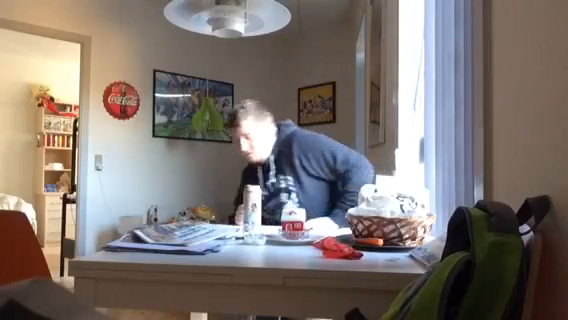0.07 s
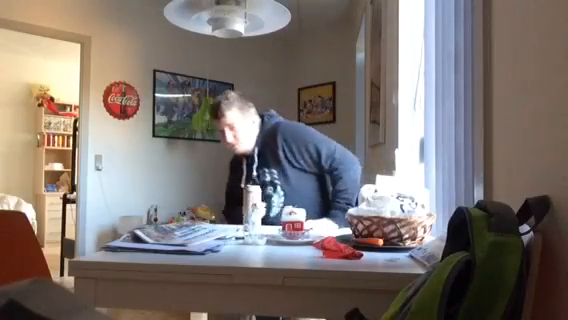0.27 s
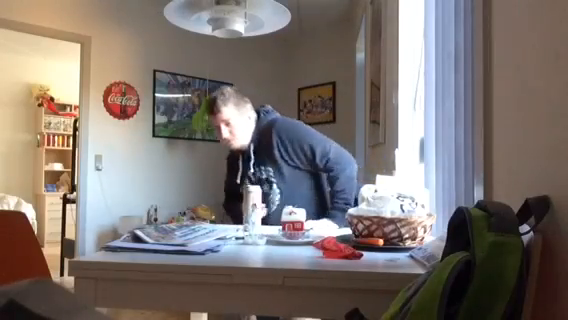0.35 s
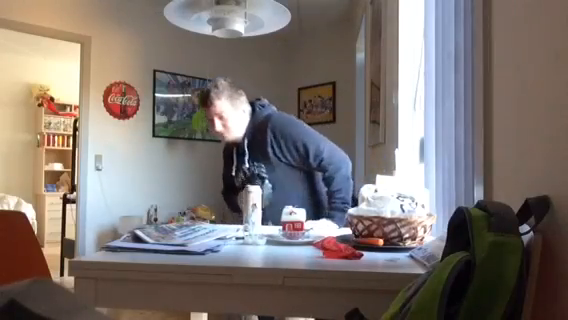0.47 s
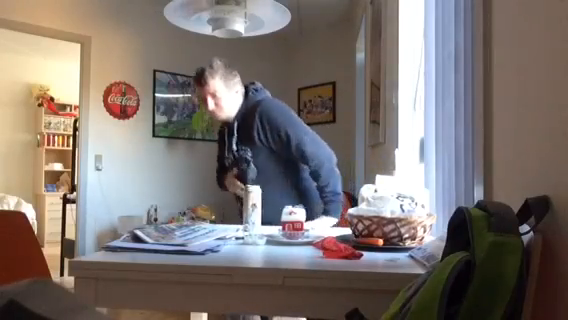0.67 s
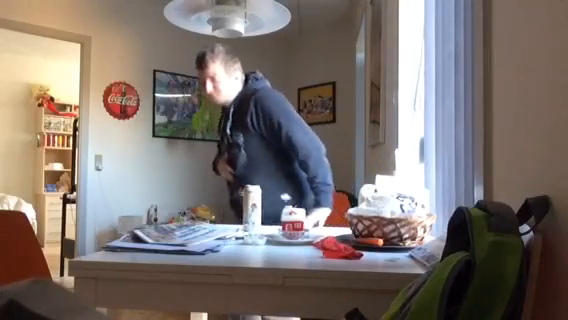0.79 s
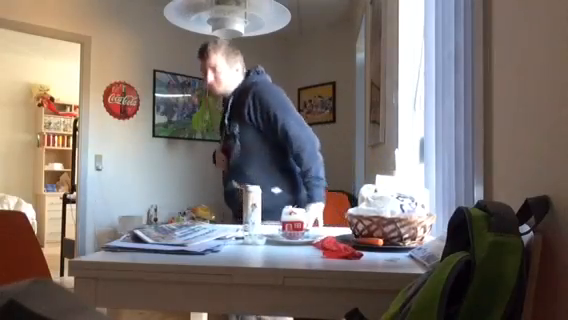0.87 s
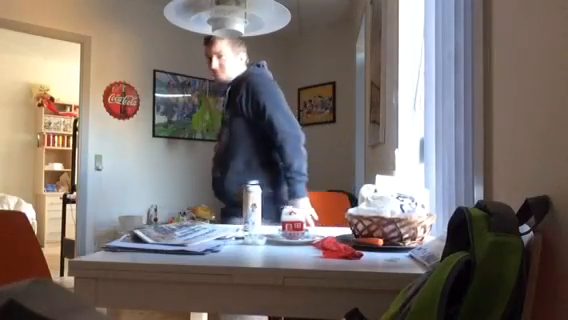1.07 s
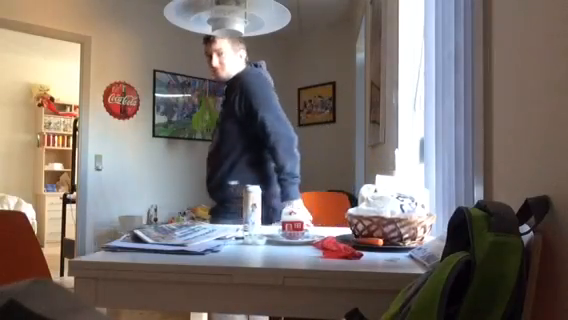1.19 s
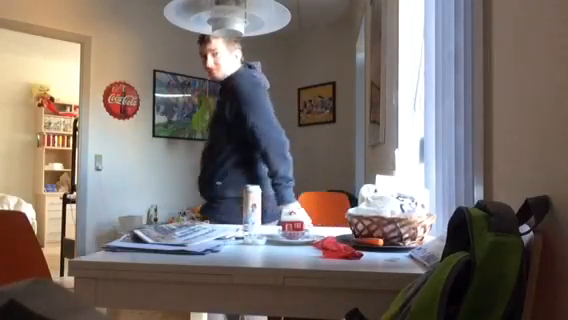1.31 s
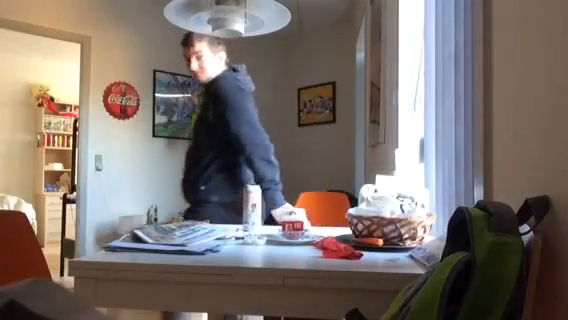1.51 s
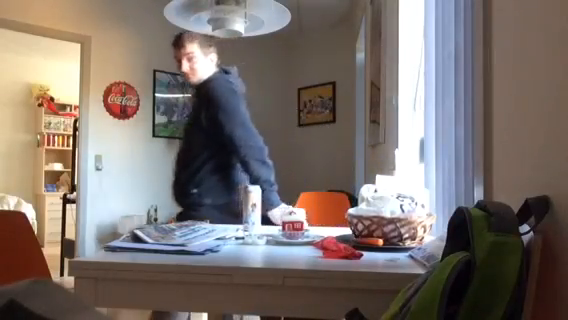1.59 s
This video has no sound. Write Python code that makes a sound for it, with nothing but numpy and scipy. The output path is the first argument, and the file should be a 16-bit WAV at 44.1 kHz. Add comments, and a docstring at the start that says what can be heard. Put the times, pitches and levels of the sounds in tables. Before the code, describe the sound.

In a small, slightly echoing room, a chair is pushed back from a table, its legs rasping and squeaking until a wooden tick ends the slide. Then clothes rustle lightly and dull footsteps thud as someone stands.

```python
"""A chair pushed back from a table

Someone stands up in a small, live room with a hard floor. Stick-slip friction of the chair's legs
drives the resonances of its frame: it judders, squeaks, rasps and groans, then stops with a sharp tick.
Soft, heavy steps set the floorboards ringing, and clothes rustle over quiet room noise."""
import sys
import numpy as np
from scipy import signal
from scipy.fft import rfft, irfft, next_fast_len
from scipy.io import wavfile
from scipy.ndimage import map_coordinates

SR = 44100
rng = np.random.default_rng(int(sys.argv[2]) if len(sys.argv) > 2 else 0)


def bounce(signal):
    """Save signal as a 16-bit WAV file at the path given by the first command-line argument."""
    frames = np.transpose(np.atleast_2d(signal))
    limited = np.clip(frames, -1, 1)
    pcm = np.round(limited * 32767).astype(np.int16)
    wavfile.write(sys.argv[1], SR, pcm)


N = 72765
RASP_SLIP_HZ, GROAN_SLIP_HZ, GRAIN_HZ = 400, 260, 3000  # median impulse rates


def amp(db):
    """Amplitude ratio of a level in decibels."""
    return 10 ** (np.asarray(db) / 20)


def unit(x):
    """Normalisation to an rms of 1."""
    return x / np.sqrt(np.mean(x ** 2) + 1e-20)


def along(points, hz):
    """Interpolation of (frequency_hz, value) points on a logarithmic frequency axis."""
    frequencies, values = np.transpose(points)
    return np.interp(np.log(hz + 1), np.log(frequencies + 1), values)


def envelope(points):
    """Amplitude envelope through (time_s, level_db) points, silent outside them."""
    time_s, level_db = np.transpose(points)
    t = np.arange(N) / SR
    return amp(np.interp(t, time_s, level_db)) * ((t >= time_s[0]) & (t <= time_s[-1]))


def filtered(x, response):
    """Linear filtering: the spectrum is multiplied by a complex frequency response."""
    size = 2 * next_fast_len(N)
    return irfft(rfft(x, size) * response(np.fft.rfftfreq(size, 1 / SR)), size)[:N]


def coloured(x, spectrum):
    """Minimum-phase filtering to a (frequency_hz, gain_db) shape, made causal by folding the cepstrum."""
    def response(hz):
        cepstrum = irfft(np.log(amp(along(spectrum, hz))))
        half = len(cepstrum) // 2
        return np.exp(rfft(np.r_[cepstrum[0], 2 * cepstrum[1:half], np.zeros(half)]))
    return filtered(x, response)


def resonate(x, modes):
    """Modal superposition: x drives parallel damped resonators (pitch_hz, width_hz, gain_db)."""
    def response(hz):
        return sum(amp(gain_db) * 1j * hz * width / (pitch ** 2 - hz ** 2 + 1j * hz * width)
                   for pitch, width, gain_db in modes)
    return filtered(x, response)


def slips(median_hz, jitter, scatter_db):
    """Stick-slip friction as an impulse train with log-normal spacings and sizes."""
    spacing, size = rng.standard_normal((8192, 2)).T
    at = (np.cumsum(np.exp(jitter * spacing)) * SR / median_hz).astype(int)
    return np.bincount(at[at < N], amp(scatter_db * size[at < N]), N)


def add(track, start_s, sound):
    """Superposition of a sound on the track from start_s onward."""
    start = round(start_s * SR)
    track[start:start + len(sound)] += sound[:N - start]


def in_room(x, tail_db):
    """Reverberation: a diffuse, exponentially decaying tail follows the sound, longest in the bass."""
    # reverberation time: frequency_hz, t60_s
    decay = [(80, 0.61), (300, 0.39), (2000, 0.32), (6000, 0.37), (15000, 0.36)]
    delay_s = .004
    hz, t, noise = signal.stft(rng.standard_normal(SR // 2), SR, nperseg=256)
    tail = signal.istft(noise * amp(-60 * t / along(decay, hz)[:, None]), SR)[1]
    tail = np.pad(tail / np.linalg.norm(tail), (round(delay_s * SR), 0))
    return (x + amp(tail_db) * signal.fftconvolve(x, tail)[:N]) / np.hypot(1, amp(tail_db))


def room_noise():
    """Stationary Gaussian noise, strongest in the bass, forms the background."""
    # noise spectrum: frequency_hz, gain_db
    spectrum = [(20, -3), (45, -1), (90, 6.5), (150, -2.5), (300, -2), (650, -6), (1200, -14.5),
                (4000, -29.5), (9000, -42), (16000, -36)]
    return amp(-63.5) * unit(coloured(rng.standard_normal(N), spectrum))


def grains(levels, spectrum, scatter_db, jitter=.8):
    """Granular friction: tiny impulses, too dense to hear singly, merge into coloured noise."""
    return unit(coloured(slips(GRAIN_HZ, jitter, scatter_db), spectrum)) * envelope(levels)


def clothes():
    """Cloth friction: a sleeve slides on the table, clothes and soles rub, the turning body swishes."""
    # envelope of each rub: time_s, level_db
    sleeve_levels = [(0, -66), (.045, -64.5), (.11, -70.5), (.17, -74), (.22, -88)]
    rustle_levels = [(0, -66), (.1, -70.5), (.2, -62.5), (.85, -63.5), (.91, -62), (.96, -63), (1.04, -63),
                     (1.11, -58), (1.18, -58), (1.26, -63), (1.34, -67.5), (1.42, -74), (1.48, -65),
                     (1.58, -85), (1.7, -69)]
    swish_levels = [(0, -69), (.05, -72.5), (.12, -84), (.3, -68.5), (.7, -64), (.85, -63.5), (1.05, -64),
                    (1.11, -62), (1.26, -64.5), (1.34, -67.5), (1.4, -72), (1.48, -69), (1.58, -72.5),
                    (1.7, -79)]
    # spectrum of each rub: frequency_hz, gain_db
    sleeve_spectrum = [(400, -30), (1900, 7.5), (2700, 0.5), (4000, 5.5), (5000, -10), (10000, -12),
                       (16000, -16)]
    rustle_spectrum = [(150, -6.5), (500, -0.5), (750, -3.5), (950, -2), (1400, 0.5), (2500, -7),
                       (3800, -15), (6000, -20.5), (16000, -41)]
    swish_spectrum = [(500, -3), (2500, -4.5), (4000, -8.5), (5500, -0.5), (8000, -1.5), (9800, -12.5),
                      (13000, -14), (16000, -15.5)]
    sleeve = grains(sleeve_levels, sleeve_spectrum, scatter_db=.5)
    rustle = grains(rustle_levels, rustle_spectrum, scatter_db=.5)
    swish = grains(swish_levels, swish_spectrum, scatter_db=.5)
    return in_room(sleeve + rustle + swish, tail_db=-6.5)


def judder():
    """Forced resonance: nearly periodic slips sustain the lowest mode of the chair's frame."""
    # envelope of the shaking: time_s, level_db
    levels = [(.185, -77), (.198, -48), (.215, -44), (.24, -31.5), (.268, -47.5), (.315, -42.5),
              (.345, -51), (.42, -44), (.53, -46), (.572, -46), (.615, -50.5), (.735, -48), (.77, -58),
              (1.04, -60.5), (1.1, -75)]
    pitch_hz, width_hz = 102.4, 38
    mode = [(pitch_hz, width_hz, 0)]
    pulses = slips(pitch_hz, jitter=.051, scatter_db=5.5)
    return unit(resonate(resonate(pulses, mode), mode)) * envelope(levels)


def legs(levels, median_hz, modes, scatter_db, shell_db):
    """Impulse excitation: irregular slips of the legs drive the chair's modes and its broadband shell."""
    # response of the shell: frequency_hz, gain_db
    shell_spectrum = [(25, -20), (50, -5), (90, 9), (170, 1), (300, -0.5), (700, -4.5), (900, -7.5),
                      (1300, -13.5), (2000, -7.5), (3000, -16.5), (6000, -21.5), (9000, -40), (16000, -49)]
    corner_hz = 2830  # of three low-pass poles that dull the ringing
    pulses = slips(median_hz, jitter=.8, scatter_db=scatter_db)
    ring = filtered(resonate(pulses, modes), lambda hz: 1 / (1 + 1j * hz / corner_hz) ** 3)
    shell = amp(shell_db) * unit(coloured(pulses, shell_spectrum))
    return unit(unit(ring) + shell) * envelope(levels)


def rasp():
    """Fast stick-slip motion rasps under the sitter's weight and returns as a light last rub."""
    # envelope of the rasp: time_s, level_db
    levels = [(.185, -70), (.205, -60.5), (.225, -47.5), (.29, -40.5), (.352, -40.5), (.366, -33.5),
              (.46, -33), (.52, -38), (.62, -44.5), (.66, -51), (.72, -57), (.86, -68.5), (.92, -55),
              (.96, -52.5), (1.05, -71)]
    # modes of the loaded chair: pitch_hz, width_hz, gain_db
    modes = [(230, 12, -9), (298, 28, 7.5), (338, 55, 3), (510, 250, 4), (668, 82, 3), (760, 70, -15),
             (974, 150, 2), (1157, 59, 3), (1414, 72, 3), (1844, 59, -1.5)]
    return legs(levels, RASP_SLIP_HZ, modes, scatter_db=2, shell_db=-8.5)


def grit():
    """Granular friction under the chair's feet gives the scrape its gritty treble."""
    # envelope of the grit: time_s, level_db
    levels = [(.2, -89), (.26, -70), (.35, -61), (.364, -40.5), (.445, -43), (.5, -49.5), (.6, -57.5),
              (.66, -66), (.73, -59.5)]
    # grain spectrum: frequency_hz, gain_db
    spectrum = [(500, -47), (1600, 10), (2700, -5), (3600, 2), (4800, -3.5), (6000, -6), (7800, -8),
                (9500, -19.5), (12000, -22.5), (16000, -35)]
    return grains(levels, spectrum, scatter_db=3.5)


def squeak():
    """As static friction gives way, slips of the chair's feet excite two high, narrow resonances."""
    # envelope of the squeak: time_s, level_db
    levels = [(.213, -91), (.219, -48), (.265, -59), (.29, -65), (.325, -82), (.36, -27)]
    # resonances, applied twice: pitch_hz, width_hz, gain_db
    modes = [(1185, 56, -2), (2480, 81, -14.5)]
    pulses = slips(RASP_SLIP_HZ, jitter=.46, scatter_db=6)
    return unit(resonate(resonate(pulses, modes), modes)) * envelope(levels)


def thumps():
    """Impacts of chair feet, heels and soles push the floor and excite modes near each contact's pitch."""
    # impacts, lower in pitch for softer contacts: start_s, level_db, pitch_hz
    impacts = [(0.192, -48.5, 252), (0.224, -48, 196), (0.472, -41.5, 81.6), (0.724, -48, 320),
               (0.813, -46, 77.5), (0.892, -54, 74.4), (1.077, -40, 285), (1.0864, -46.5, 111),
               (1.099, -39.5, 192), (1.13, -43.5, 101), (1.135, -49, 338), (1.198, -54, 105),
               (1.361, -40.5, 137), (1.367, -47.5, 556), (1.384, -43, 120), (1.449, -45.5, 82),
               (1.536, -54, 115)]
    # floorboard modes: pitch_hz, gain_db, t60_s
    boards = [(86, -22, 0.039), (101.6, -2.5, 0.12), (120, 2.5, 0.04), (189.7, 4.5, 0.09),
              (222.4, 2, 0.082), (270, 1.5, 0.15), (345, -5, 0.19), (452, -1.5, 0.14), (740, -7, 0.15)]
    attack_s, contact_q = .0024, 1.8
    push_db, push_cycles = -.5, 2.54
    track, t = np.zeros(N), np.arange(SR // 2) / SR
    for start_s, level_db, contact_hz in impacts:
        ring = np.zeros(len(t))
        for mode_hz, gain_db, t60_s in boards:
            detuning = contact_q * (mode_hz / contact_hz - contact_hz / mode_hz)
            gain = amp(gain_db + rng.normal(0, 1)) / np.hypot(1, detuning)
            ring += gain * np.sin(2 * np.pi * mode_hz * t) * amp(-60 * t / t60_s)
        push_decay = np.exp(-(t * contact_hz / push_cycles) ** 2)
        push = amp(push_db) * np.sin(2 * np.pi * contact_hz * t) * push_decay
        attack = 1 - np.exp(-t / attack_s)
        add(track, start_s, amp(level_db) * (ring + push) * attack)
    return in_room(track, tail_db=-3)


def singing():
    """Mode locking: a leg's slips lock onto one resonance, which wavers and sags as the load eases."""
    # locked tones: start_s, length_s, pitch_hz, level_db
    tones = [(.348, .05, 325, -34), (0.32, 0.15, 250, -50), (.46, 0.069, 231, -32.5),
             (.425, 0.098, 541, -40.5), (.53, .1, 454, -31.5), (.575, 0.082, 480, -35.5),
             (0.42, 0.114, 1278, -43), (.885, 0.072, 332, -54)]
    sag_per_s, waver_depth = .44, .022  # as fractions of the pitch
    wavers_per_s = 192
    track = np.zeros(N)
    for start_s, length_s, pitch_hz, level_db in tones:
        t = np.arange(round(length_s * SR)) / SR
        waver = map_coordinates(rng.standard_normal(256), [t * wavers_per_s])
        hz = pitch_hz * (1 - sag_per_s * (t - length_s / 2) + waver_depth * waver)
        swell = amp(level_db) * np.sin(np.pi * t / length_s)
        add(track, start_s, swell * np.sin(2 * np.pi * np.cumsum(hz) / SR))
    return in_room(track, tail_db=-8)


def groan():
    """Slower stick-slip motion draws a hollow groan from the chair as the weight comes off."""
    # envelope of the groan: time_s, level_db
    levels = [(.4, -49), (.47, -37.5), (.535, -35.5), (.575, -34.5), (.615, -35), (.645, -46.5), (.72, -63),
              (.77, -86)]
    # modes of the lightened chair: pitch_hz, width_hz, gain_db
    modes = [(217, 29, -8), (278, 19, -11), (343, 13, -7), (452, 58, 0.5), (490, 22, -10), (549, 54, 1),
             (687, 30, -7), (1190, 45, -4.5), (1280, 35, 7.5), (2620, 43, -9.5)]
    return legs(levels, GROAN_SLIP_HZ, modes, scatter_db=1.5, shell_db=-5.5)


def sand():
    """Brittle fracture: sand crushed under a foot gives a brief, bright sizzle."""
    # envelope of the sizzle: time_s, level_db
    levels = [(.425, -74), (.441, -50), (.455, -68), (.5, -84)]
    # grain spectrum: frequency_hz, gain_db
    spectrum = [(3000, -20), (9000, 5), (16000, -5)]
    return grains(levels, spectrum, scatter_db=2, jitter=.73)


def drone():
    """Lightly damped low modes drone as the empty chair slides to rest."""
    # envelope of the drone: time_s, level_db
    levels = [(.63, -61), (.67, -47), (.715, -41), (.76, -53.5), (.81, -56), (.87, -71)]
    # modes of the empty chair: pitch_hz, width_hz, gain_db
    modes = [(221, 18, 9), (343, 21, 7), (423, 21, 0), (530, 11, -11), (700, 15, -9)]
    return legs(levels, GROAN_SLIP_HZ, modes, scatter_db=.5, shell_db=-6)


def ticks():
    """A short, hard contact has a broad spectrum: it cracks and rings the wood as the chair stops."""
    # contact impulses: start_s, level_db
    contacts = [(0.724, -11), (0.7426, -30)]
    # resonances of the wood, applied twice: pitch_hz, width_hz, gain_db
    modes = [(1356, 210, 5), (1717, 420, 5.5), (2294, 520, 3), (3235, 600, -2)]
    crack_db, crack_t60_s = -31, .0014
    track, t = np.zeros(N), np.arange(SR // 20) / SR
    for start_s, level_db in contacts:
        blow = np.zeros(N)
        blow[round(start_s * SR)] = amp(level_db)
        track += resonate(resonate(blow, modes), modes)
        crack = rng.standard_normal(len(t)) * amp(-60 * t / crack_t60_s)
        add(track, start_s, amp(level_db + crack_db) * crack)
    return in_room(track, tail_db=-1)


def scene():
    """Sound pressures add: chair, steps and clothes sum with the room's noise in one channel."""
    background = room_noise()
    frame = judder()
    scrape = in_room(rasp() + groan() + squeak() + grit() + sand() + drone(), tail_db=2)
    chair = frame + scrape + singing() + ticks()
    return (chair + thumps() + clothes() + background)[None]


def record(dry):
    """The microphone is a band-pass filter: a second-order bass roll-off and a sharp upper limit."""
    bass_cut_hz, top_hz = 56, 15700

    def response(hz):
        s = 1j * hz / bass_cut_hz
        return (hz < top_hz) * s * s / (s * s + np.sqrt(2) * s + 1)
    return filtered(dry[0], response)[None]


dry = scene()
out = record(dry)
bounce(out)
```